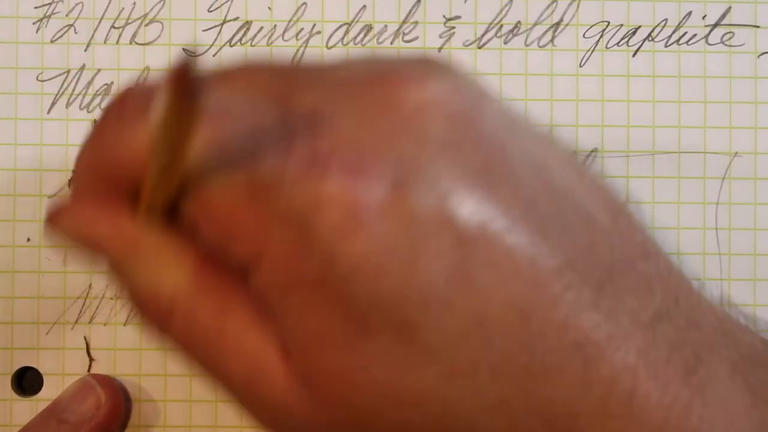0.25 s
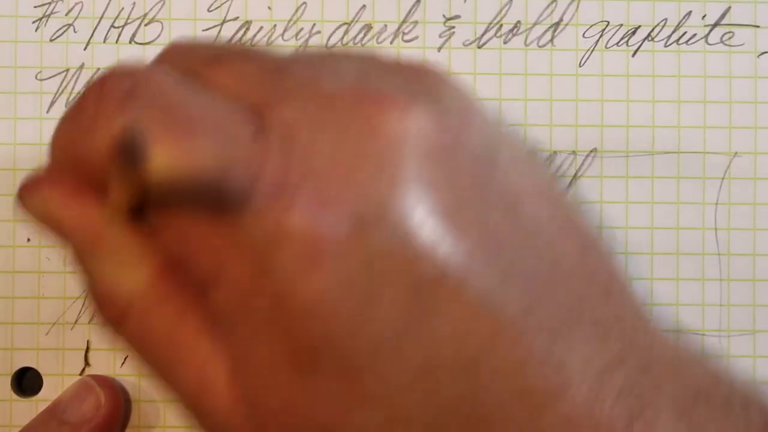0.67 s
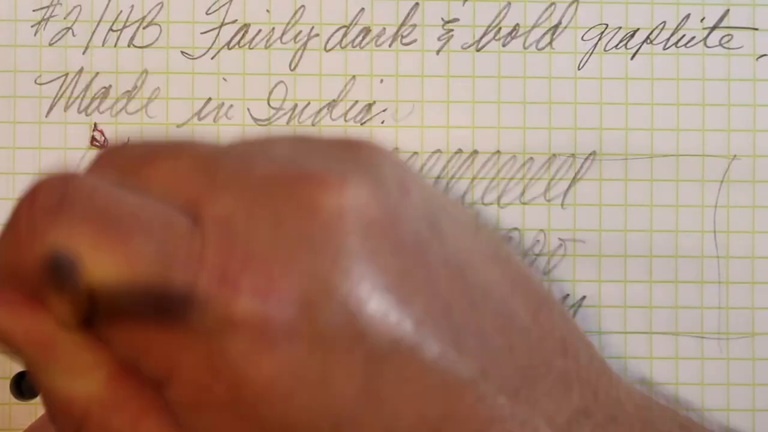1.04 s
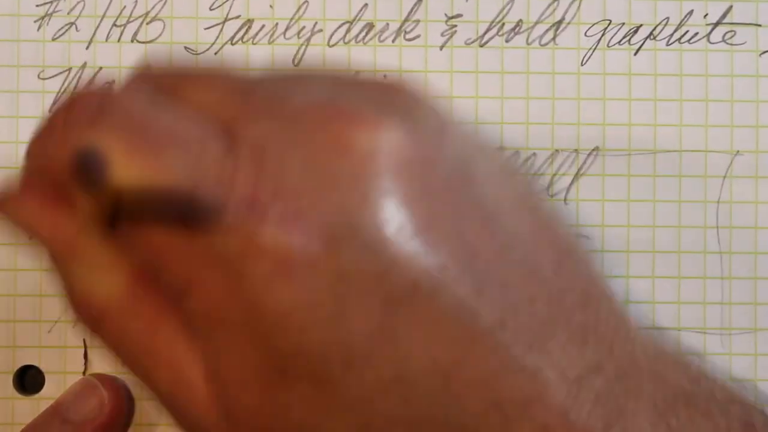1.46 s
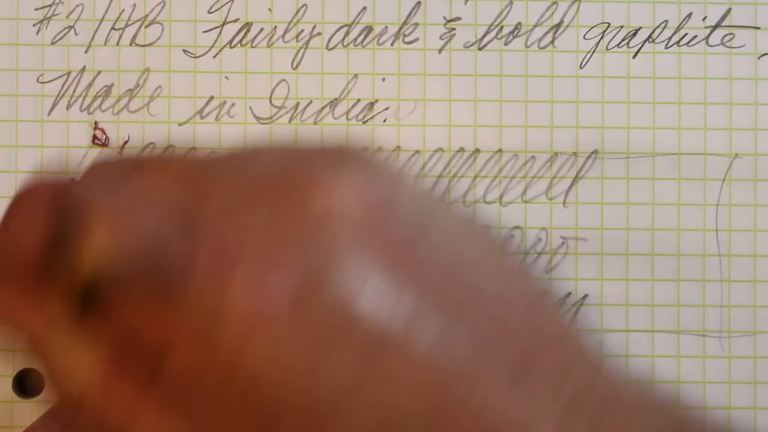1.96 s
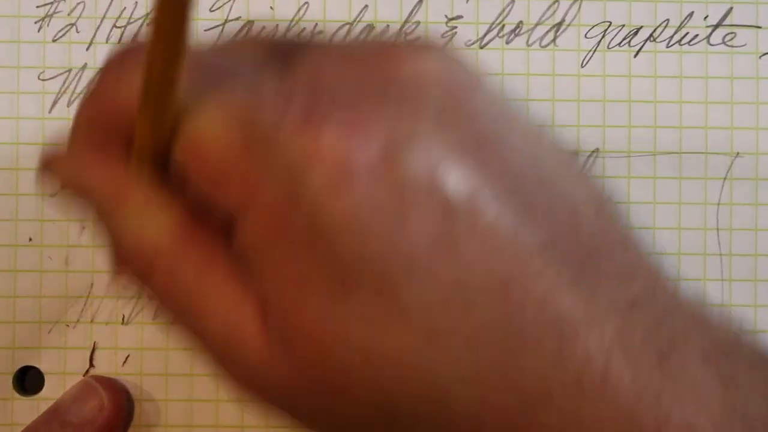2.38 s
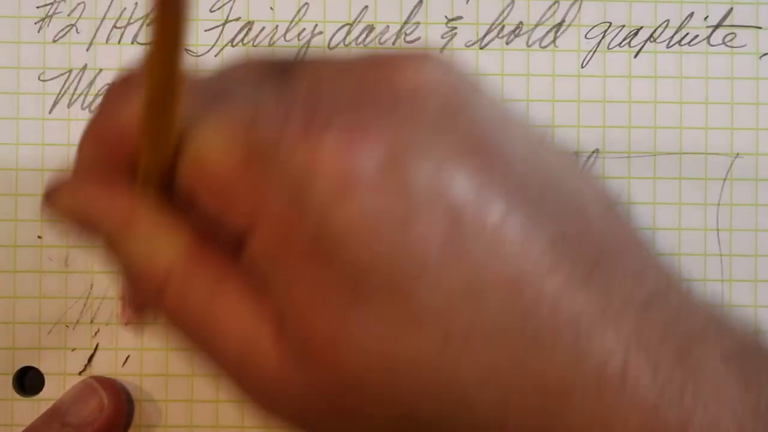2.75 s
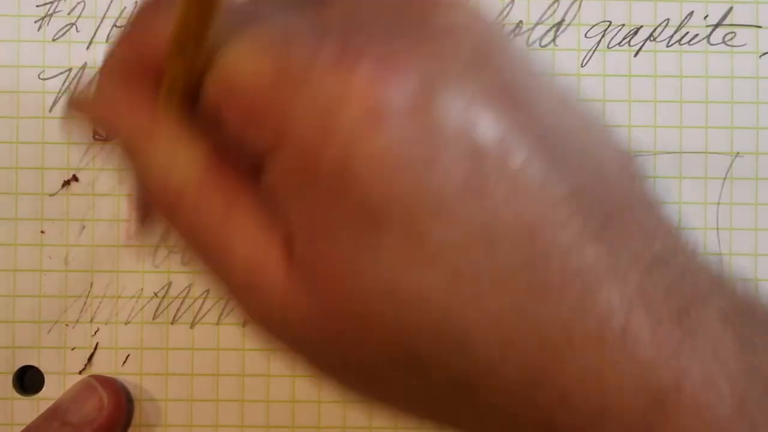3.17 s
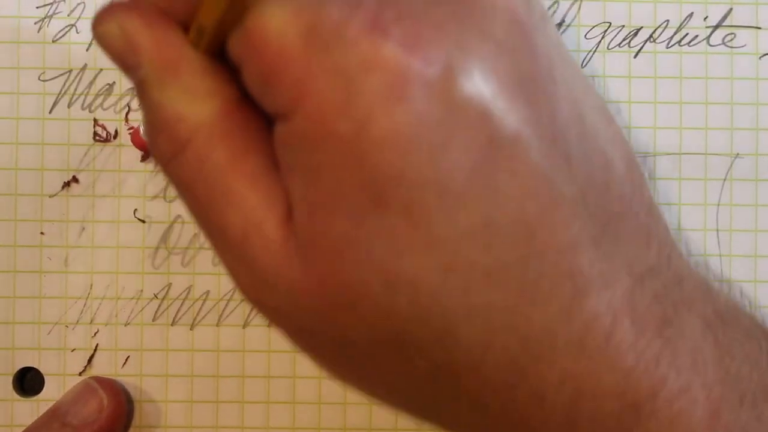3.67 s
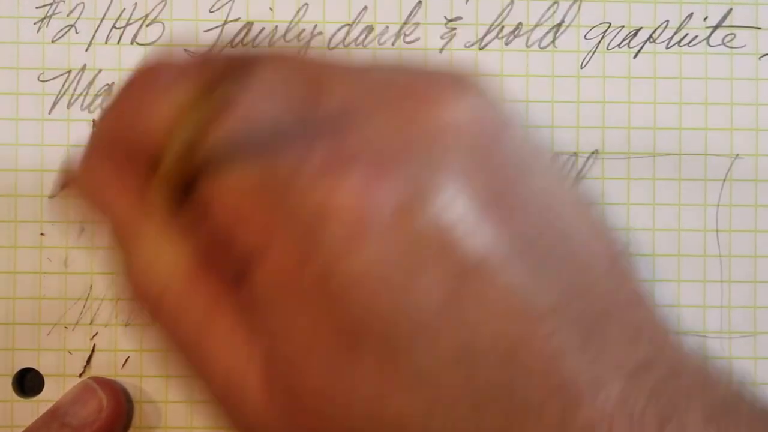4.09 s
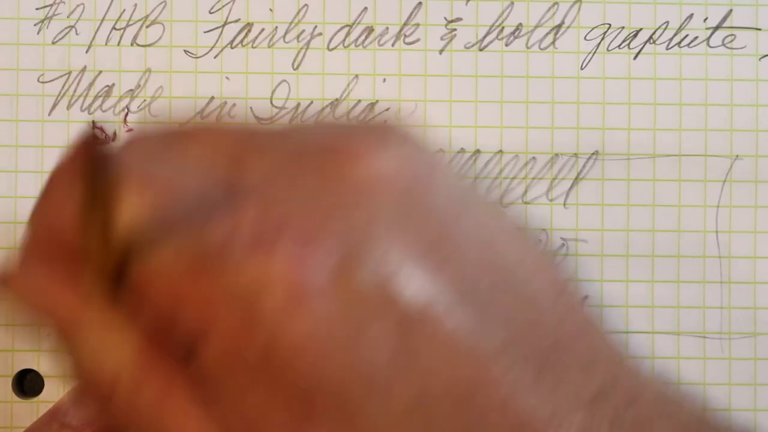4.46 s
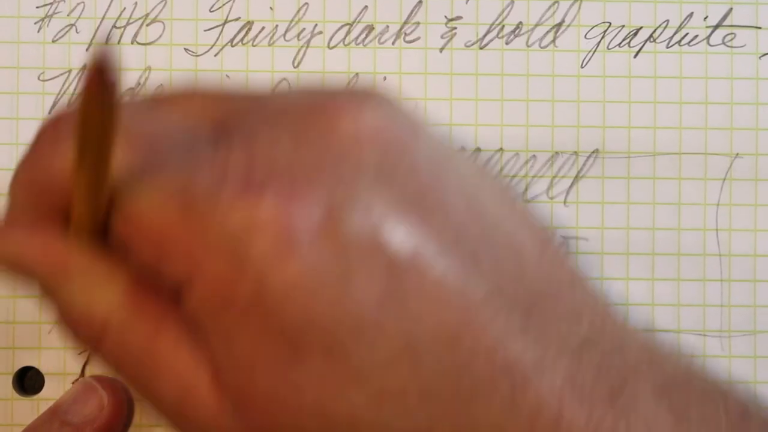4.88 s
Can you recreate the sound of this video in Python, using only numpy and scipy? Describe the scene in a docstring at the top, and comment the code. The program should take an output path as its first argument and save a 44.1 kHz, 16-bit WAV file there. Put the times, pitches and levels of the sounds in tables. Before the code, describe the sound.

Close to the microphone in a small room, an eraser rasps over paper in quick, uneven push and pull strokes. Early on the rubber drags the sheet up, giving a few sharp crackles and hollow thumps that make the desk ring briefly. After that the scrubbing continues to the end with only small crinkles and light flaps of the page, over the faint rustle of a sliding hand.

```python
"""Pencil eraser on a desk

An eraser scrubs to and fro over a sheet of paper, close to a stereo microphone in a small room.
Each stroke rasps as the rubber sticks and slips over the fibres, and the hand slides along on the page.
Now and then the rubber drags the sheet up: it pops, snaps back and thumps on the desk, which rings."""
import sys
import numpy as np
from scipy import signal
from scipy.fft import rfft, irfft, next_fast_len
from scipy.io import wavfile

SR = 44100
rng = np.random.default_rng(int(sys.argv[2]) if len(sys.argv) > 2 else 0)


def store_pcm(level_fs):
    """Save levels as 16-bit WAV."""
    pcm = np.round(np.clip(level_fs, -1, 1) * 32767).astype(np.int16)
    wavfile.write(sys.argv[1], SR, np.atleast_2d(pcm).T)


N = 226385

# eraser strokes, push and pull in turn, a push first: start_s, end_s, hiss_db
STROKES = [(-0.065, 0.019, -39), (0.11, 0.22, -42), (0.318, 0.382, -41), (0.455, 0.543, -41.5),
           (0.611, 0.714, -41), (0.776, 0.858, -46.5), (0.925, 0.995, -44.5), (1.056, 1.126, -46),
           (1.203, 1.291, -42), (1.33, 1.415, -43.5), (1.493, 1.565, -39.5), (1.601, 1.709, -42.5),
           (1.774, 1.852, -39), (1.887, 2.004, -45.5), (2.052, 2.166, -43.5), (2.283, 2.344, -50.5),
           (2.416, 2.551, -41.5), (2.631, 2.756, -44.5), (2.821, 2.948, -41.5), (3.064, 3.148, -44),
           (3.204, 3.325, -41), (3.417, 3.489, -48.5), (3.572, 3.642, -45), (3.787, 3.903, -46.5),
           (3.986, 4.079, -44.5), (4.143, 4.237, -45.5), (4.315, 4.412, -43.5), (4.478, 4.567, -43),
           (4.64, 4.738, -42.5), (4.785, 4.89, -47), (4.954, 5.036, -43), (5.107, 5.17, -49)]
# how heavily the hand slides on the page: time_s, rustle_db
HAND_PRESSURE = [(0.04, -47.5), (0.26, -69.5), (0.45, -60), (0.8, -57), (1.2, -54.5), (1.48, -49),
                 (1.8, -60), (2.38, -52), (2.6, -63), (2.96, -60), (3.4, -61), (3.7, -67), (4.15, -70),
                 (4.42, -51.5), (4.75, -70), (5.1, -70)]
LIGHT_LANDING_DB = -32  # a light thump of the sheet; a landing's extra_db counts from here
STROKE_SAMPLES = 8192  # room for one stroke or scuff


def eraser(full_speed=0.78, spot_spread=0.13):
    """Rubber rasps over paper: the hiss levels off at speed, and stick and slip make it flutter."""
    # friction hiss of each direction: frequency_hz, level_db
    push_spectrum = [(900, -24.5), (2000, -1.5), (2650, 1), (3200, -3.5), (4300, 0.5), (5350, 4),
                     (6150, -4.5), (7100, 1.5), (7800, -1.5), (8700, 3.5), (10200, -4.5), (13000, -14.5),
                     (15800, -24)]
    pull_spectrum = [(900, -43), (2000, 1.5), (3100, -4.5), (3650, 4), (4200, -4.5), (5000, 2.5),
                     (6500, -2.5), (7500, -3), (8900, -0.5), (10000, -5), (11500, -13.5), (13500, -22),
                     (15800, -45)]
    # the sheet shaken by the rubber: frequency_hz, level_db
    rub_spectrum = [(60, -9.5), (160, -4), (240, -0.5), (440, -4), (590, 8), (720, 3), (900, 1),
                    (1150, -1.5), (1400, 2), (2000, -5.5), (3500, -8.5), (8000, -21)]
    # a push, then a pull: speed_exponent, rub_db, lower_resonance_hz, upper_resonance_hz, top_db
    directions = [(2, -50, 5670, 7060, -1), (0.92, -47, 5330, 8500, 2)]
    # brightness of the hiss: time_s, treble_db, air_db
    brightness = [(0.2, -0.5, 6), (1.2, 1.5, 1.5), (2.0, -1, 0), (2.6, -4, 8), (3.6, -6, 4.5),
                  (5.0, 0.5, 3)]
    hiss, rub = np.zeros((2, N)), np.zeros(N)
    for k, (start, end, hiss_db) in enumerate(STROKES):
        exponent, rub_db, lower_hz, upper_hz, top_db = directions[k % 2]
        spectrum = (push_spectrum, pull_spectrum)[k % 2]
        speed = arc(end - start)
        spot = 1 + spot_spread * (2 * rng.random(2) - 1)  # the sheet's resonances vary from spot to spot
        treble_db, air_db = at_time(brightness, start)
        peaks = [(lower_hz * spot[0], 800, 2.0), (upper_hz * spot[1], 800, 2.0),
                 (9300, 3500, treble_db), (13500, 6000, top_db + air_db)]
        rasp = friction(spectrum, grain_db=1.0, size=STROKE_SAMPLES, peaks=peaks, ripple_db=2.5)
        add(hiss, start, from_db(hiss_db) * np.tanh(speed ** exponent / full_speed) * rasp)
        add(rub, start, from_db(rub_db) * speed ** 0.44)  # the low rub is there even at slow speed
    slip = drift(rate_hz=83)
    low_rub = rub * friction(rub_spectrum, grain_db=3.0)
    return hiss * from_db(0.9 * slip) + low_rub * from_db(2.0 * slip)


def snaps(crack_s=0.016, tail_s=0.048, flutter_s=0.033, rebound_s=0.032, thud_hz=68, thud_s=0.057):
    """The sheet rips free in a short crackle, then lands and rebounds while the desk top gives."""
    # the sheet snaps back and lands: start_s, crack_db, thump_db, thump_delay_s
    events = [(0.404, -50.5, -37, 0.0012), (0.689, -31.5, -43, 0.0036), (0.748, -47.5, -38.5, 0.00049),
              (0.956, -39.5, -30, 0.011), (0.986, -55, -38.5, 0.0034), (1.119, -57, -37.5, 0.004),
              (1.294, -28.5, -18.5, 0.0076), (1.499, -67, -34, 0.0014), (1.588, -25, -19, 0.01),
              (1.885, -24, -15, 0.0023), (2.082, -41, -40, 0.0077), (2.166, -29, -21.5, 0.0088),
              (2.361, -40.5, -35, 0.0039), (2.393, -46, -42, 0.0054), (2.434, -42.5, -54, 0.006),
              (2.911, -45, -33.5, 0.0018), (3.106, -40, -32, 0.0043), (3.297, -52.5, -39, 0.003),
              (3.486, -48, -36, 0.0026), (3.818, -59, -49, 0.00012), (3.864, -49.5, -35, 0.0012),
              (4.077, -38.5, -30, 0.01), (4.356, -60, -39, 0), (4.612, -43.5, -33, 0.002),
              (4.688, -50, -35, 0), (4.812, -46, -53, 0.003), (5.003, -50, -36, 0.0015),
              (5.122, -44, -32, 0.011)]
    # the crack of a snap: frequency_hz, level_db
    crack_spectrum = [(120, -5), (370, 5.5), (530, 2), (700, 1.5), (1000, -3), (1600, 1.5), (2100, -4.5),
                      (2900, -8.5), (3600, -8.5), (4200, -10.5), (5300, -9.5), (6500, -17), (10000, -27),
                      (16000, -57)]
    # the sheet fluttering after it lands: frequency_hz, level_db
    flutter_spectrum = [(100, -24), (200, -9.5), (310, 4.5), (390, -7.5), (520, -7.5), (1200, -14),
                        (5000, -62)]
    age = np.arange(SR // 6) / SR
    crackle, thumps, flutter = np.zeros((3, N))
    swell = 1 - np.exp(-age / 0.0012)
    burst = swell * (np.exp(-(age / crack_s) ** 2) + 0.053 * np.exp(-age / tail_s))
    thud_phase = 2 * np.pi * thud_hz * age
    thud = (np.sin(thud_phase) - 1.13 * np.sin(1.775 * thud_phase)) * np.exp(-age / thud_s)
    rebound_delays = rebound_s * rng.uniform(0.778, 1.2, len(events))
    for (start, crack_db, thump_db, delay), rebound_delay in zip(events, rebound_delays):
        extra_db = thump_db - LIGHT_LANDING_DB
        touchdown = start + delay
        add(crackle, start, from_db(crack_db) * burst)
        add(flutter, touchdown, from_db(-45 + 0.96 * extra_db) * swell * np.exp(-age / flutter_s))
        add(thumps, touchdown, landing(thump_db, age) + from_db(-55 + 0.6 * extra_db) * thud)
        add(thumps, touchdown + rebound_delay, landing(-48.5 + 0.22 * extra_db, age))
    peaks = [(1564, 240, 2.17), (1900, 170, 7.5), (2440, 120, 7.7), (3390, 41, 1.5), (3680, 55, 1.5)]
    cracks = pan(-2.2) * crackle * friction(crack_spectrum, grain_db=2.5, peaks=peaks)
    return cracks, thumps + flutter * friction(flutter_spectrum, grain_db=1.5)


def landing(level_db, age, rise_s=0.00096):
    """The sheet flaps on the desk in two modes; harder landings flap lower and die sooner."""
    extra_db = level_db - LIGHT_LANDING_DB
    flap_hz = 229.9 - 1.12 * extra_db
    length_s = 0.017 * np.exp(-0.017 * extra_db)
    swing = (1 - np.exp(-age / rise_s)) * np.exp(-(age / length_s) ** 2)
    phase = 2 * np.pi * flap_hz * age
    return from_db(level_db) * swing * (np.sin(phase) + 0.3 * np.sin(1.54 * phase))


def pops(ring_s=0.0025, rise_s=0.00021, rasp_share=0.27):
    """A small buckle in the sheet flips over with a short, rasping, hollow note."""
    # buckles popping through: start_s, level_db, pitch_hz
    buckles = [(1.2584, -22, 1420), (1.264, -19, 1413), (1.272, -20, 1430), (1.5521, -24, 1390),
               (1.558, -29.5, 1530), (3.821, -24.5, 590), (4.509, -25, 1030)]
    # their rasp: frequency_hz, level_db
    rasp_spectrum = [(700, -2), (1400, -15), (2500, 2), (3500, 1), (4500, -17), (12000, -42)]
    age = np.arange(SR // 30) / SR
    notes, crackle = np.zeros((2, N))
    for start, level_db, pitch_hz in buckles:
        swing = from_db(level_db) * (1 - np.exp(-age / rise_s)) * np.exp(-age / ring_s)
        add(notes, start, swing * np.sin(2 * np.pi * pitch_hz * age))
        add(crackle, start, swing)
    return notes + rasp_share * crackle * friction(rasp_spectrum, grain_db=3.0)


def hand(lag_s=0.011, flutter_db=3.0):
    """The hand trails the strokes, brushing the page; the desk rumbles most while it moves."""
    # skin brushing the page: frequency_hz, level_db
    rustle_spectrum = [(250, 4.5), (550, -1.5), (1000, 2), (1450, 3.5), (2300, -1), (3500, -7),
                       (6000, -16.5), (10000, -39), (16000, -52)]
    # the desk under the moving hand: frequency_hz, level_db
    rumble_spectrum = [(20, -37), (55, -3), (90, 5), (130, 2), (220, 2.5), (350, 0.5), (500, -6.5),
                       (1000, -44)]
    # the weight of the hand on the desk: time_s, rumble_db
    weight = [(0.2, -58.5), (2.3, -54), (3.5, -58.5), (3.87, -51), (4.3, -57.5), (5.05, -52.5)]
    speed = np.zeros(N)
    for start, end, _ in STROKES:
        add(speed, start, arc(end - start))
    pole = np.exp(-1 / (lag_s * SR))
    motion = signal.lfilter([1 - pole], [1, -pole], speed - speed.mean())
    rustle_db, = at_time(HAND_PRESSURE, TIME)
    rumble_db, = at_time(weight, TIME)
    rustle_gain = from_db(rustle_db - 0.5 * motion + flutter_db * drift(rate_hz=27))
    rustle = rustle_gain * friction(rustle_spectrum, grain_db=2.5)
    rumble = from_db(rumble_db + 6 * motion) * friction(rumble_spectrum, grain_db=2.5)
    return rustle + rumble


def scuffs():
    """Skin or rubber catches: uneven stick and slip around one rate gives a short rough note."""
    # catches on the page: middle_s, length_s, pitch_hz, level_db
    catches = [(0.048, 0.14, 2200, -48), (0.033, 0.11, 242, -47.5), (0.436, 0.058, 1030, -49.5),
               (2.577, 0.1, 1400, -59), (3.83, 0.035, 585, -44.5), (3.868, 0.075, 473, -45.5),
               (4.432, 0.032, 2310, -50.5), (4.771, 0.07, 1460, -56), (4.87, 0.036, 674, -46.5)]
    notes = np.zeros((2, N))
    for middle, length, hz, level_db in catches:
        spectrum = [(hz / 3, -20), (hz, 0), (hz * 3, -20)]
        note = friction(spectrum, grain_db=3.5, size=STROKE_SAMPLES, peaks=[(hz, 0.4 * hz, 20.0)])
        add(notes, middle - length / 2, from_db(level_db) * np.sqrt(arc(length)) * note)
    return notes


def crinkles(grab_s=0.004, rise_s=0.00074, decay_s=0.0072, over_rustle_db=10, spread_db=1.5):
    """The sheet ticks drily as each stroke grabs it and lets it go, louder under a heavier hand."""
    # a flexing sheet: frequency_hz, level_db
    flex_spectrum = [(200, -5), (600, 25), (1500, 1), (2800, -11), (4500, -41), (8000, -30), (16000, -48)]
    age, ticks = np.arange(SR // 30) / SR, np.zeros(N)
    tick = (1 - np.exp(-age / rise_s)) * np.exp(-age / decay_s)
    for start, end, _ in STROKES:
        for moment in (start + grab_s, end):
            rustle_db, = at_time(HAND_PRESSURE, moment)
            tick_db = rustle_db + over_rustle_db - spread_db * rng.uniform(-1, 1)
            add(ticks, moment, from_db(tick_db) * tick)
    return ticks * friction(flex_spectrum, grain_db=-2.5)


def desk(force):
    """Each mode of the desk rings on after whatever shakes it and radiates its own way."""
    # the desk and the things on it: pitch_hz, gain_db, t60_s, left_minus_right_db
    modes = [(185.3, 6.5, 0.25, 4), (223.4, -13, 0.16, -5), (350.7, 5.5, 0.14, -2), (507, -2.5, 0.057, 1),
             (745, -5, 0.6, -4), (1193, -0.5, 0.11, 4), (1410, -6, 0.82, -5), (1553.5, -2.5, 0.094, 1),
             (1767, 5.5, 0.64, -4), (1938, -3.5, 0.22, 1), (2260, 1, 0.28, 2), (2430, 3, 0.27, -11.5),
             (2543, 8.5, 0.39, 5), (2757, 3, 0.26, 17), (3216, 10, 0.13, -12), (3334, 1.5, 0.14, 9),
             (3530, 1.5, 0.19, 14), (3710, 4, 0.11, -15), (3926, 1, 0.2, 9), (4670, 2, 0.15, -7),
             (5360, 1.5, 0.12, 4)]
    ringing = np.zeros((2, N))
    for pitch_hz, gain_db, t60_s, pan_db in modes:
        radius, angle = from_db(-60 / (t60_s * SR)), 2 * np.pi * pitch_hz / SR
        drive = (1 - radius ** 2) / 2
        feedback = [1, -2 * radius * np.cos(angle), radius ** 2]
        ring = signal.lfilter([drive, 0, -drive], feedback, force + 1e-18)
        ringing += from_db(gain_db) * pan(pan_db) * ring
    return ringing


def room(sound, t60_s=0.26, gap_s=0.0065, wall_hz=4500, alike_hz=1600):
    """Near walls return dull, dense reflections, alike on left and right only in the bass."""
    age = np.arange(SR // 2) / SR
    mid, side = rng.standard_normal((2, len(age)))
    side = signal.sosfilt(signal.butter(1, alike_hz, "high", fs=SR, output="sos"), side)
    echoes = (mid + side * [[1], [-1]]) * from_db(-60 * age / t60_s) * (age > gap_s)
    echoes = unit_rms(echoes) / np.sqrt(len(age))
    echoes = signal.sosfilt(signal.butter(1, wall_hz, fs=SR, output="sos"), echoes)
    return signal.fftconvolve(sound, echoes, axes=1)[:, :N]


def room_tone(level_db=-56):
    """The hush of the room arrives from all sides, along with the microphone's own hiss."""
    # hush and hiss: frequency_hz, level_db
    spectrum = [(20, -14), (60, 14), (120, 10), (380, 15), (800, 12.5), (2000, 7), (4000, 5), (8000, 1),
                (12000, -4), (16000, -11)]
    # how alike they are on left and right: frequency_hz, correlation
    likeness = [(60, 0.51), (250, 0.18), (500, 0.033), (3000, 0.017), (15000, 0.033)]
    return from_db(level_db) * friction(spectrum, grain_db=-1, likeness=likeness)


def friction(spectrum, grain_db, size=N, peaks=(), ripple_db=0.0, likeness=None):
    """Countless tiny uneven contacts as stereo noise of unit rms; peaks: centre_hz, width_hz, gain_db."""
    # how alike rubbing and blows are on left and right: frequency_hz, correlation
    close_likeness = [(60, 0.87), (300, 0.89), (700, 0.85), (1400, 0.7), (3000, 0.63), (7000, 0.84),
                      (15000, 0.5)]
    # stereo balance at the microphone: frequency_hz, left_minus_right_db
    balance = [(60, -1.5), (350, -0.5), (1200, 0), (2400, 0), (4500, 1), (8000, 1), (14000, 0.5)]
    padded = next_fast_len(size)
    hz = np.arange(padded // 2 + 1) * SR / padded
    colour_db = at_hz(spectrum, hz)
    for centre_hz, width_hz, gain_db in peaks:
        colour_db += gain_db / (1 + ((hz - centre_hz) / (width_hz / 2)) ** 2)
    # waves coming back from the edges of the sheet ripple the spectrum differently at every spot
    ripple_hz = np.arange(0, SR / 2, 170)
    colour_db += ripple_db * np.interp(hz, ripple_hz, rng.standard_normal(len(ripple_hz)))
    grains = rng.standard_normal((2, padded))
    grains *= from_db(grain_db * np.minimum(rng.exponential(1, padded), 5))
    mid, side = rfft(grains) * from_db(colour_db)
    alike = np.clip(at_hz(likeness or close_likeness, hz), 0, .99)
    stereo = np.sqrt(1 + alike) * mid + np.sqrt(1 - alike) * side * [[1], [-1]]
    return unit_rms(irfft(stereo * pan(at_hz(balance, hz)), padded)[:, :size])


def arc(length_s):
    """Half a sine that lasts length_s, then rest: the speed of a stroke."""
    phase = np.arange(STROKE_SAMPLES) / SR / length_s
    return np.sin(np.pi * phase) * (phase < 1)


def drift(rate_hz):
    """Smooth random wander of unit rms."""
    pole = np.exp(-2 * np.pi * rate_hz / SR)
    wander = signal.lfilter([1], [1, -2 * pole, pole * pole], rng.standard_normal(2 * N))
    return unit_rms(wander[N:])


def add(track, start_s, sound):
    """Mix a short sound into a track."""
    start = int(start_s * SR)
    skip = max(-start, 0)
    part = sound[..., skip:max(N - start, 0)]
    track[..., start + skip:start + skip + part.shape[-1]] += part


def at_time(points, time_s):
    """Read each column of a curve at a given time."""
    times, *columns = np.transpose(points)
    return [np.interp(time_s, times, column) for column in columns]


def at_hz(points, hz):
    """Read a table on a log-frequency axis."""
    frequencies, values = np.transpose(points)
    return np.interp(np.log(hz + 1e-3), np.log(frequencies), values)


def pan(left_minus_right_db):
    """Left and right gains for a level difference."""
    return from_db(np.array([[0.5], [-0.5]]) * left_minus_right_db)


def from_db(db):
    """Decibels to gain."""
    return 10 ** (np.asarray(db) / 20)


def unit_rms(x):
    """Scale to unit power."""
    return x / np.sqrt(np.mean(x ** 2) + 1e-20)


def scene():
    """Eraser, hand and sheet all shake the desk and sound in the room."""
    rubbing = eraser() + hand() + scuffs() + crinkles()
    cracks, thumps = snaps()
    blows = cracks + thumps + pops()
    ringing = desk(from_db(7.5) * cracks.mean(axis=0) + from_db(-12.5) * thumps
                   + from_db(-17.5) * rubbing.mean(axis=0))
    reflections = room(from_db(-9.0) * rubbing + from_db(-6.0) * blows)
    return rubbing + blows + ringing + reflections + room_tone()


def record(dry):
    """The top is cut steeply above 15850 Hz."""
    return signal.sosfilt(signal.ellip(12, .1, 90, 15850, fs=SR, output="sos"), dry)


TIME = np.arange(N) / SR

dry = scene()
out = record(dry)
store_pcm(out)
```